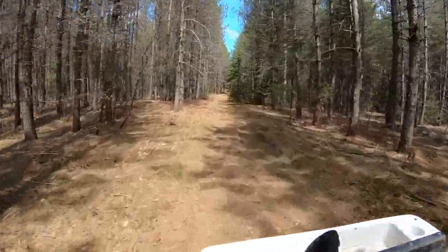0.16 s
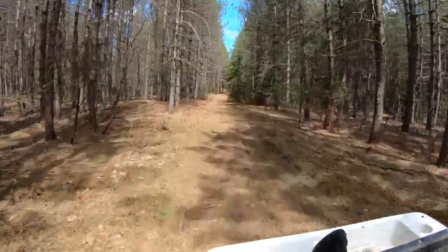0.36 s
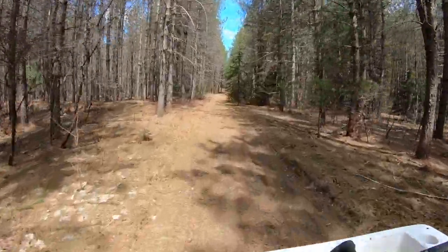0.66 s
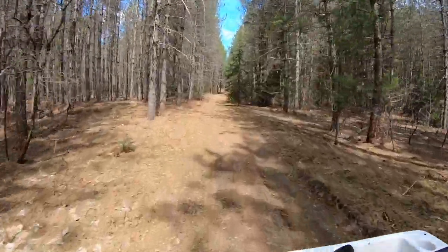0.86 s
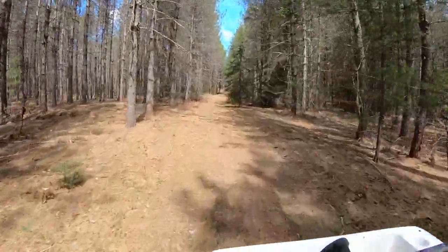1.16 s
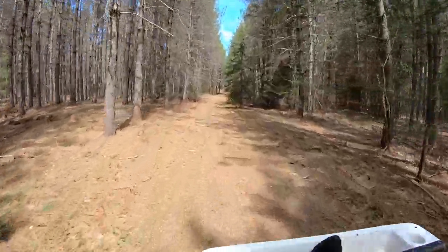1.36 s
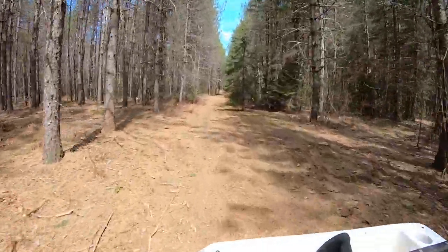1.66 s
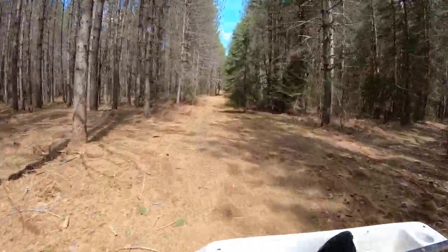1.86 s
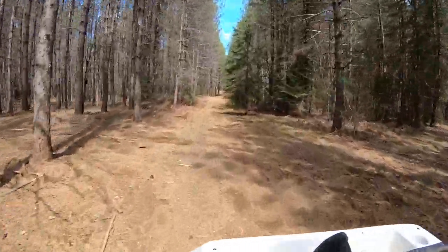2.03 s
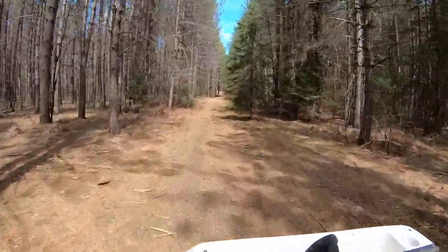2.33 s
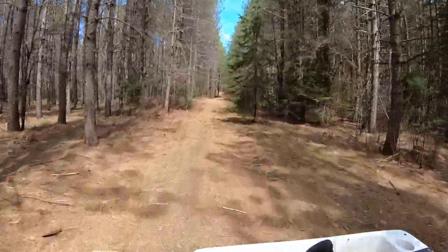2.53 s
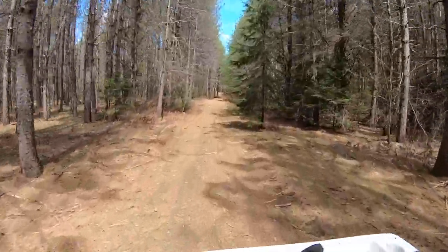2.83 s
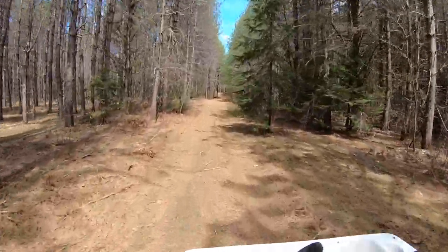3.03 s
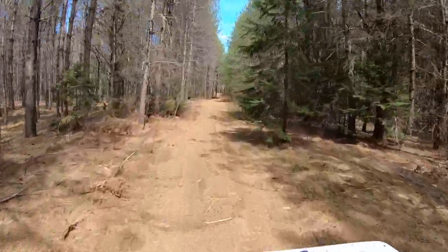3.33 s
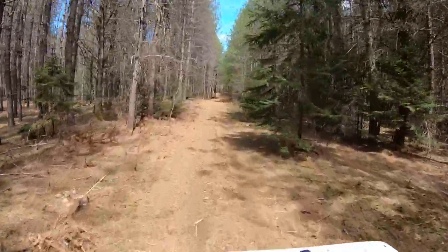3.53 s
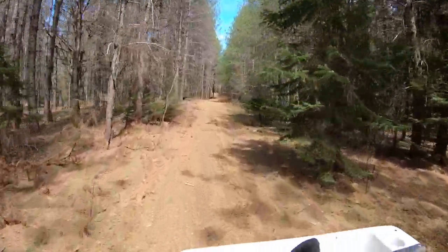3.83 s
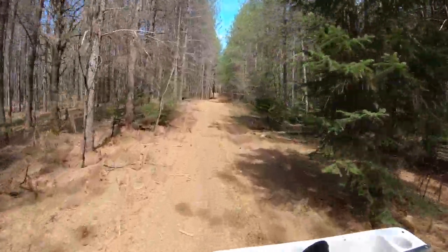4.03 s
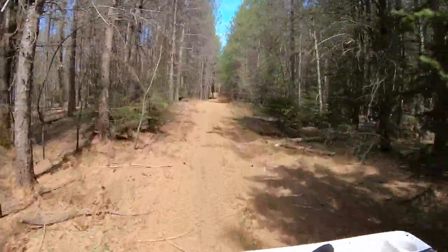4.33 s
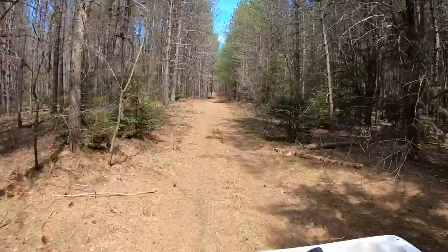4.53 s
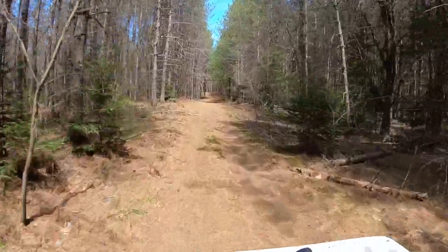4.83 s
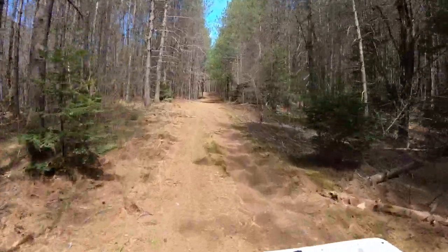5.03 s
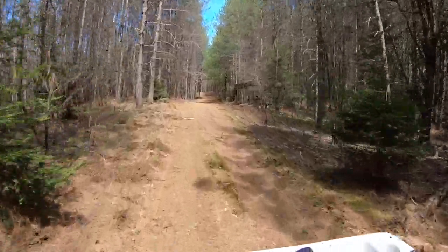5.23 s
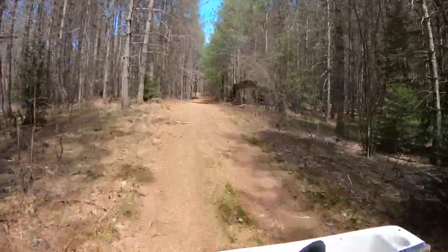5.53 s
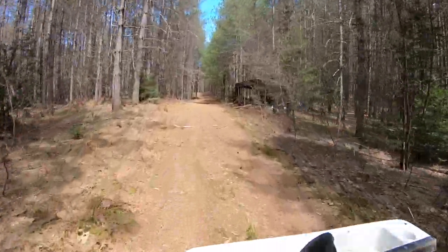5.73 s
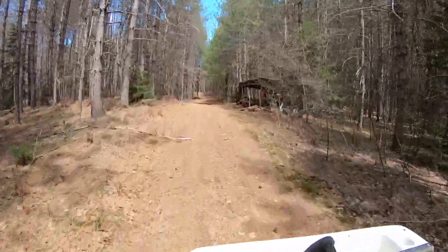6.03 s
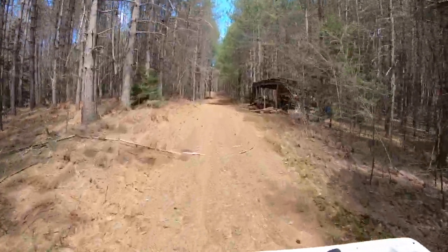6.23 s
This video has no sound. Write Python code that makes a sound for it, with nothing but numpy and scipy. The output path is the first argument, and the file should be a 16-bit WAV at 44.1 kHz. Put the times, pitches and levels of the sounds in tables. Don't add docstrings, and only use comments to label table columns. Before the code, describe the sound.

On board a small motor cart on a dirt trail: constant buzzing engine boom, running-gear roar, tiny rattling ticks, and wind gusts thumping at the end.

```python
import sys
import numpy as np
from scipy import signal
from scipy.fft import rfft, irfft, next_fast_len
from scipy.io import wavfile

SR = 44100
rng = np.random.default_rng(int(sys.argv[2]) if len(sys.argv) > 2 else 0)


def inscribe(sig):
    pcm = np.round(np.clip(np.atleast_2d(sig).T, -1, 1) * 32767)
    wavfile.write(sys.argv[1], SR, pcm.astype(np.int16))


def boost_factor(decibels):
    exponent = np.asarray(decibels, float) / 20
    return 10 ** exponent


N = 281347

# time_s, firings_per_s
CRANK_SPEED = [(0, 58.2), (.42, 59.4), (.62, 54.8), (.85, 58.1), (1.3, 59.4), (1.6, 58.8), (2, 56.2),
               (2.55, 55.5), (3.03, 56.7), (3.28, 55.5), (3.62, 57.1), (4.18, 55.1), (4.5, 56.4),
               (4.9, 57.2), (5.25, 57.1), (5.5, 56.5), (6.38, 55.6)]
# pitch_hz, level_db (per Hz)
ROAR_COLOUR = [(400, -34), (600, -1), (700, -9.5), (950, -8.5), (1250, -12.5), (1700, -14.5), (2100, -20.5),
               (2700, -23.5), (3200, -28.5), (3900, -37.5), (5000, -59.5)]
BASS_LAG_S, ROAR_LAG_S, HISS_LAG_S, TICK_LAG_S = .00022, .00005, .00009, .00003


def rms_one(x):
    return x / np.sqrt(np.mean(x ** 2) + 1e-20)


def in_time(rows):
    s, *columns = np.transpose(rows)
    return [np.interp(np.arange(N) / SR, s, c) for c in columns]


def at_hz(points, hz, axis=1):
    points = np.array(points)
    return np.interp(np.log(hz), np.log(points[:, 0]), points[:, axis])


def drift(rate):
    hop = 40
    r = np.exp(-80 * np.pi * rate / SR)
    slow = signal.lfilter([1], [1, -2 * r, r * r], rng.standard_normal(N // hop + 2002))[2000:]
    return np.interp(np.arange(N) / hop, np.arange(len(slow)), rms_one(slow))


def resonance(x, hz, width_hz):
    r = np.exp(-np.pi * width_hz / SR)
    gain = (1 - r * r) / 2
    poles = [1, -2 * r * np.cos(2 * np.pi * hz / SR), r * r]
    return signal.lfilter(np.array([1, 0, -1]) * gain, poles, x + 1e-18)


def butter(x, order, hz, kind="low"):
    return signal.sosfilt(signal.butter(order, hz, kind, fs=SR, output="sos"), x)


def ports(x, lag_s, other=None):
    # pitch_hz, likeness (0 to 1), left_minus_right_db
    housing = [(40, 0.69, -1.5), (294, 1, -1), (680, 0.8, -4.5), (930, 0.18, -9.5), (1440, 0.22, -15.5),
               (2400, 0.31, -11.5), (4100, .1, -6.5), (5460, .55, -3.5), (6900, .62, -7.5),
               (8600, 0.13, -5.5), (13300, 0.15, -7.5)]
    edge, size = 1024, 2 * next_fast_len(N // 2 + 1025)
    fade = np.pad(np.ones(N), edge, "linear_ramp")
    hz = np.maximum(np.fft.rfftfreq(size, 1 / SR), 1)
    shade = boost_factor(at_hz(housing, hz, axis=2) / 2)
    right = rfft(np.pad(x, edge, "reflect") * fade, size)
    left = right * np.exp(-2j * np.pi * hz * lag_s)
    if other is not None:
        alike = np.clip(at_hz(housing, hz), 0, 1)
        unrelated = rfft(np.pad(other, edge, "reflect") * fade, size)
        left = alike * left + np.sqrt(1 - alike ** 2) * unrelated
    return irfft(np.array([left * shade, right / shade]), size)[:, edge:edge + N]


def banded_noise(spectrum, lag_s, patchy_db, together_db):
    size = 2 * next_fast_len(N // 2 + 1)
    hz = np.maximum(np.fft.rfftfreq(size, 1 / SR), 1)
    low_hz, top_hz = spectrum[0][0], spectrum[-1][0]
    colour = boost_factor(at_hz(spectrum, hz)) * (hz > low_hz) * (hz < top_hz)
    white = rfft(rng.standard_normal((2, size))) * colour
    shared = drift(16.0) + 0.57 * drift(28.0)
    place = np.log2(hz / low_hz) * 6 / np.log2(top_hz / low_hz)
    out = 0
    for k in range(7):
        band = np.clip(1 - abs(place - k), 0, 1)
        flicker = boost_factor(together_db * shared + patchy_db * drift(8.9))
        out = out + irfft(white * band, size)[:, :N] * flicker
    pair = ports(out[0], lag_s, out[1])
    return pair / np.sqrt(np.mean(pair.mean(0) ** 2))


def crank_turns():
    # time_s, behind_turns
    slip = [(0, .81), (.5, 2.25), (.81, 2.59), (1.2, 3.14), (1.44, 3.65), (1.76, 3.97), (2.43, 5.05),
            (2.62, 5.51), (2.94, 6.14), (3.49, 7.43), (3.65, 7.72), (4.14, 8.73), (4.66, 9.86),
            (4.95, 10.43), (5.36, 11.14), (5.57, 11.53), (5.95, 12.11), (6.38, 13.02)]
    per_s, = in_time(CRANK_SPEED)
    crank = np.cumsum(per_s * (1 + .004 * drift(12.44))) / SR
    return crank, crank - in_time(slip)[0]


def exhaust(turns, pulley):
    # time_s, second_order_db, third_order_db, pulley_over_crank_db
    boom = [(0.0, -26.5, -24, -9.3), (0.54, -23.5, -31, -8.5), (0.63, -23, -24, -6.5),
            (1.27, -23.5, -27.5, -8.5), (1.55, -34, -22, -6), (1.88, -20, -29.5, 1.7),
            (2.22, -24.5, -22.9, 9.5), (2.43, -19.5, -33, 7), (2.81, -23, -22.5, 7),
            (2.89, -22.8, -31.5, 7.5), (3.65, -21.5, -23.5, 2.5), (4.1, -24.5, -34, 3.5),
            (4.14, -19, -26, 5.5), (4.49, -22, -28, -0.8), (5.18, -23.5, -24.5, 9.5), (5.3, -27, -35, 9.5),
            (5.67, -22, -26, 6.5), (6.38, -27, -28, 2.5)]
    # order (multiple), crank_db, pulley_over_crank_db
    upper = [(4, -35.5, -9), (5, -36, -13), (5.5, -43, -20), (6, -35.5, -13)]
    # order (multiple), level_db
    weak = [(1, -34.5), (1.5, -37.5), (7, -46.5), (8, -49.5), (9, -51), (10, -45), (11, -43.5), (12, -53.5)]
    second_db, third_db, pulley_db = in_time(boom)
    per_s, = in_time(CRANK_SPEED)
    second_swing_db, third_swing_db = second_db - second_db.mean(), third_db - third_db.mean()

    def beating(order, behind, over_db, phase):
        crank_tone = np.sin(2 * np.pi * order * turns + phase)
        pulley_tone = np.sin(2 * np.pi * order * behind + phase)
        return boost_factor(-over_db / 2) * crank_tone + boost_factor(over_db / 2) * pulley_tone

    out = boost_factor(second_db + 0.29 * drift(8.0)) * beating(2, pulley, pulley_db, 0.33 * drift(4.3))
    third = beating(3, pulley - .057, pulley_db, 1.0 + 0.4 * drift(5.0))
    out += boost_factor(third_db + 1.3 * drift(7.4)) * third
    for order, db, over_db in upper:
        db = db + .3 + over_db / 2 + .15 * third_swing_db
        if order == 4:
            db += 1.55 * (per_s - per_s.mean()) + .5 * second_swing_db
        phase = 0.25 * drift(4.0) + rng.uniform(0, 2 * np.pi)
        out += boost_factor(db + 1.6 * drift(3.0)) * beating(order, pulley, over_db, phase)
    for order, db in weak:
        phase = .5 * drift(4.6) + rng.uniform(0, 2 * np.pi)
        out += boost_factor(db + 2.3 * drift(8.9)) * np.sin(2 * np.pi * order * turns + phase)
    return np.sqrt(2) * out


def panels(turns, load_db):
    # pitch_hz, width_hz, level_db
    modes = [(336.1, 29, -4.5), (477, 25, -4), (610.4, 40, -2.5), (644.6, 45, -5.5), (738, 49, -5.5),
             (1624, 390, -13.5), (2705, 60, -26)]
    fired = np.diff(np.floor(turns), prepend=0) * boost_factor(1.9 * drift(49.0))
    shake = rms_one(fired) + 1.06 * rng.standard_normal(N)
    shake = shake * boost_factor(load_db + 1.8 * drift(5.0))
    out = np.zeros(N)
    for hz, width, db in modes:
        ring = resonance(resonance(shake, hz, width), hz, 2 * width)
        out += boost_factor(db - 37.5 + 0.19 * drift(2.3)) * rms_one(ring)
    return out


def rumble(beat):
    # pitch_hz, level_db (per Hz)
    colour = [(18, -46), (30, -11), (59, -23.5), (88, 1), (113, -1.5), (261, -11), (332, -10.5),
              (417, -20.5), (613, -24.5), (900, -38), (1170, -69.5), (1980, -120)]
    return boost_factor(-24) * banded_noise(colour, BASS_LAG_S, patchy_db=-0.5, together_db=-0.15) * beat


def roar(roar_db, beat):
    return boost_factor(roar_db + 1.0) * banded_noise(ROAR_COLOUR, ROAR_LAG_S, patchy_db=1.4, together_db=0.57) * beat


def hiss(load_db):
    # pitch_hz, level_db (per Hz)
    colour = [(2800, -14), (3800, -9), (4800, -6), (5600, -2.5), (6100, -1), (7300, -5.5), (7900, -9),
              (8100, -11.5), (10300, -13.5), (10700, -17.5), (12500, -25), (13000, -23.5), (14500, -31.5)]
    air = banded_noise(colour, HISS_LAG_S, patchy_db=-0.3, together_db=1.1)
    return air * boost_factor(-61 + 0.93 * load_db)


def whines():
    # pitch_hz, width_hz, level_db
    whistles = [(5830, 190, -67), (6000, 150, -76.5), (6940, 140, -76), (7260, 200, -77.5)]
    out = np.zeros(N)
    for hz, width, db in whistles:
        tone = resonance(resonance(rng.standard_normal(N), hz, width), hz, width)
        out += boost_factor(db + 1.5 * drift(3.0)) * rms_one(tone)
    return out


def chatter(roar_db):
    struck = rng.random(N) < 500.0 / SR
    strength = boost_factor(3.0 * np.minimum(rng.exponential(1, N), 4.0))
    knocks = struck * strength * rng.choice([-1, 1], N)
    dealt = rng.integers(0, 16, N)
    pitches = np.geomspace(750, 3400, 16) * boost_factor(rng.normal(0, .25, 16))
    rings = np.zeros(N)
    for k, hz in enumerate(pitches):
        ring = resonance(knocks * (dealt == k), hz, 0.015 * hz)
        rings += boost_factor(at_hz(ROAR_COLOUR, hz)) * np.sqrt(hz) * rms_one(ring)
    return boost_factor(roar_db - 9.5) * rms_one(rings)


def wind():
    # top_s, length_s, left_db, right_db
    gusts = [(.5, .2, -31, -26), (1.2, 0.39, -26.5, -31), (1.6, 0.16, -22, -22.5), (1.95, .2, -24.5, -31.5),
             (3.4, 0.4, -29.5, -44), (4.1, 0.18, -26, -34.5), (5.45, .25, -21.5, -36.5),
             (5.95, 0.27, -20, -33.5), (6.105, 0.033, -17.5, -41), (6.185, 0.028, -19, -25),
             (6.33, 0.033, -20, -36)]
    # left_db, right_db
    breeze_db = [-30.5, -36]
    s, length, *gust_db = np.transpose(gusts)
    swell = np.exp(-((np.arange(N)[:, None] / SR - s) / length) ** 2)
    levels_db = [10 * np.log10(boost_factor(2 * calm_db) + swell @ boost_factor(2 * db))
                 for calm_db, db in zip(breeze_db, gust_db)]
    top_hz = 103 * boost_factor(.45 * (levels_db[0] - breeze_db[0]))
    share = np.clip(np.log(top_hz / 90) / np.log(600 / 90), 0, 1)
    out = []
    for level_db in levels_db:
        noise = butter(rng.standard_normal(N), 3, 33, "high")
        dull = butter(butter(noise, 2, 90), 2, 450)
        bright = butter(signal.lfilter([1], [1, -.975], noise), 4, 750)
        mixed = np.sqrt(1 - share) * rms_one(dull) + share * rms_one(bright)
        out.append(boost_factor(level_db + 2.0 * drift(12.0)) * mixed)
    return np.array(out)


def ticks():
    # start_s, peak_db, pitch_hz, length_s, body_db
    bumps = [(0.549, -52, 6800, 0.013, 6.5), (0.71, -50.5, 5830, 0.0068, 3),
             (1.417, -53, 6200, 0.0089, 0.5), (2.098, -42, 7650, 0.018, 3.5), (2.117, -47, 7450, 0.012, 6),
             (2.398, -62, 6080, 0.007, 9), (2.604, -57.5, 5800, 0.0068, 1), (3.29, -56.5, 6900, 0.02, 2),
             (4.132, -60.5, 6700, 0.008, 12.5), (4.384, -69, 7200, 0.014, 23),
             (4.622, -34, 7540, 0.0023, -6), (4.628, -43, 7300, 0.0022, -2),
             (4.761, -50, 7500, 0.0086, -1.5)]
    # pitch_hz, width_hz, level_db
    body_modes = [(650, 180, 6.5), (1300, 360, 8.5), (2360, 190, 6), (3600, 680, -10.5), (5800, 2500, -13)]
    crack_s = .0015
    out, after = np.zeros(N), np.arange(3000) / SR
    for s, db, hz, length, body_db in bumps:
        buzz = rng.standard_normal(len(after)) * np.exp(-(after / length) ** 2)
        body = sum(boost_factor(level_db) * resonance(buzz, body_hz, width) for body_hz, width, level_db in body_modes)
        part = resonance(resonance(buzz, hz, 300), hz, 900)
        crack = np.diff(buzz * np.exp(-after / crack_s), prepend=0)
        tick = 1.3 * part + boost_factor(body_db) * butter(body, 3, 6000)
        tick += boost_factor(-5.0) * (crack_s / length) ** 2 * crack
        at = round(s * SR)
        out[at:at + len(after)] += boost_factor(db + 7.5) * tick[:N - at]
    return butter(out, 1, 9000)


def puffs():
    # top_s, level_db, length_s
    bursts = [
        (6.103, -28, .014),
        (6.187, -31, .011),
    ]
    noise = rms_one(butter(rng.standard_normal(N), 2, [300, 900], "band"))
    shape = sum(boost_factor(db) * np.exp(-((np.arange(N) / SR - s) / length) ** 2) for s, db, length in bursts)
    return noise * shape * boost_factor([[0], [-9.0]])


def scene():
    # time_s, roar_db
    trail = [(0, -38.5), (.54, -38.5), (.68, -40), (.73, -37), (1.42, -36.5), (2.33, -38), (2.6, -38),
             (3.2, -39), (3.34, -36.5), (3.72, -39.5), (3.97, -41), (4.18, -39.5), (4.39, -36.5),
             (4.57, -38), (5.1, -40.5), (5.7, -39.5), (6.1, -38), (6.38, -39)]
    turns, pulley = crank_turns()
    roar_db, = in_time(trail)
    load_db = roar_db - roar_db.mean()
    beat = 1 + 0.02 * np.sin(2 * np.pi * turns)
    sway_db = .7 * drift(14.0)
    engine = ports(exhaust(turns, pulley) + panels(turns, load_db), BASS_LAG_S) * boost_factor([sway_db, -sway_db])
    low = engine + rumble(beat) + roar(roar_db, beat)
    high = hiss(load_db) + ports(whines(), HISS_LAG_S)
    high += ports(chatter(roar_db) + ticks(), TICK_LAG_S)
    right_db = -1.1 - 2.5 * np.maximum(np.arange(N) / SR - 5.57, 0)
    return (low + high) * boost_factor([0 * right_db, right_db]) + wind() + puffs()


def band_limit(x):
    return signal.sosfilt(signal.butter(12, 14450, fs=SR, output="sos"), x)


def record(dry):
    opening = np.sin(np.pi / 2 * np.minimum(np.arange(N) / (.001 * SR), 1)) ** 2
    rounded = 0.91 * np.tanh(dry * opening / 0.89)
    return band_limit(rounded)


dry = scene()
out = record(dry)
inscribe(out)
```